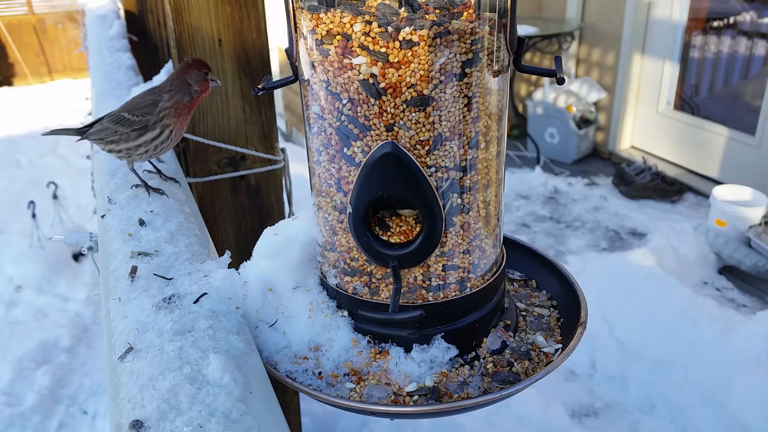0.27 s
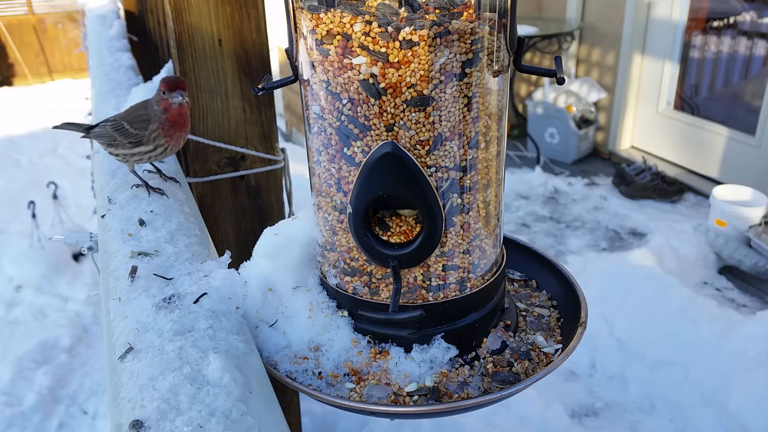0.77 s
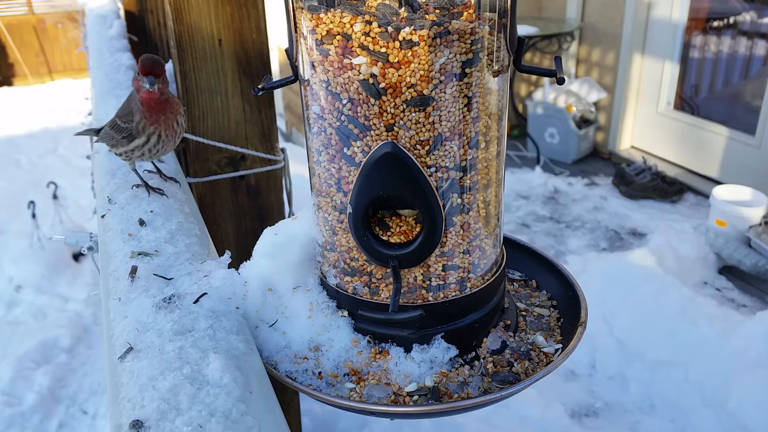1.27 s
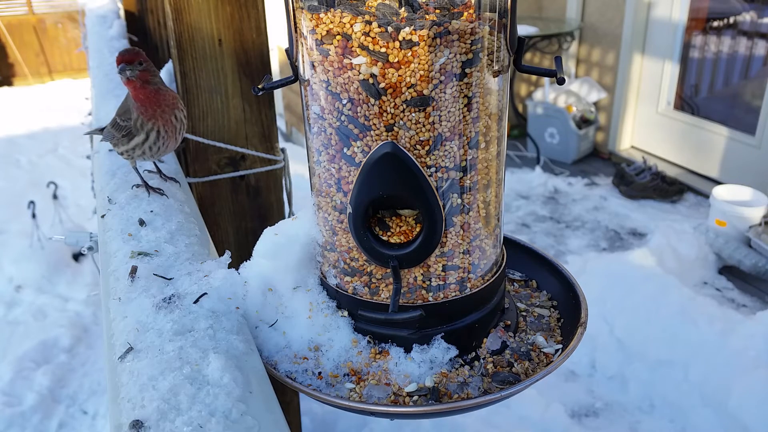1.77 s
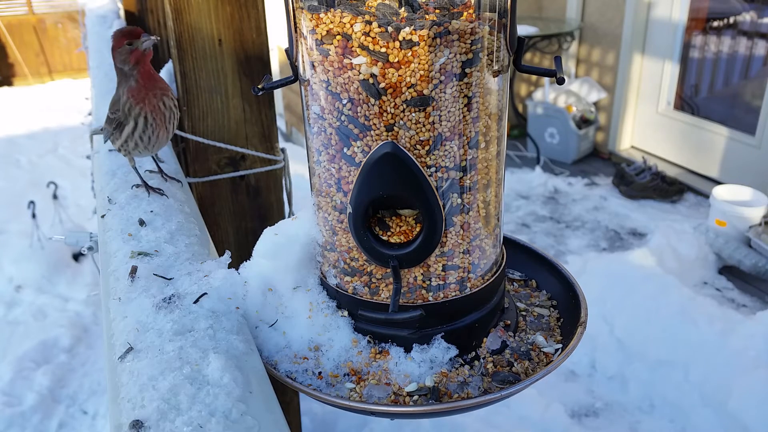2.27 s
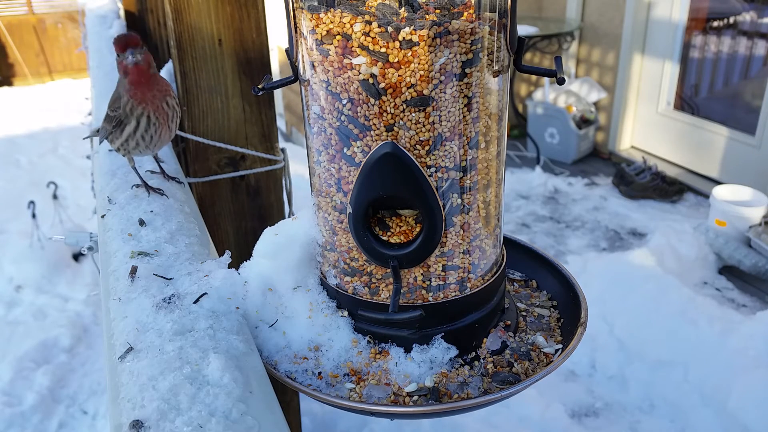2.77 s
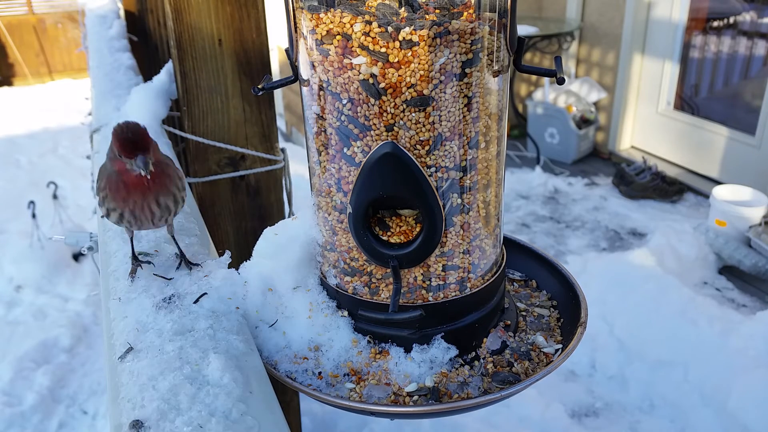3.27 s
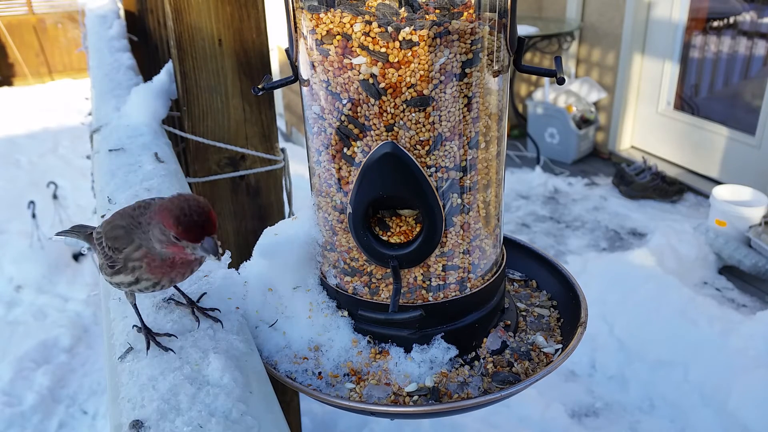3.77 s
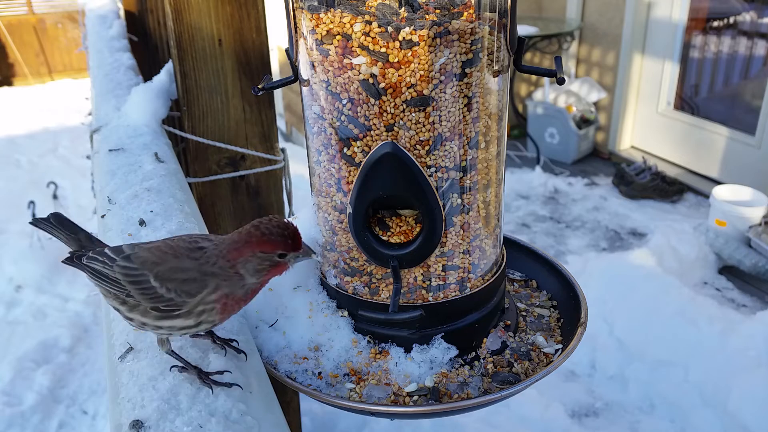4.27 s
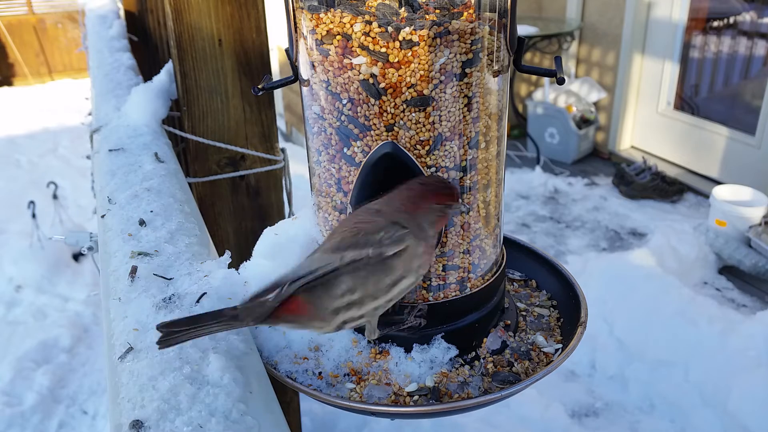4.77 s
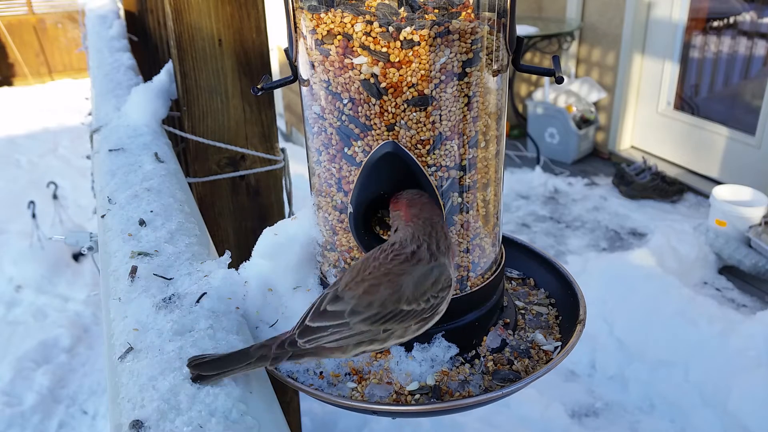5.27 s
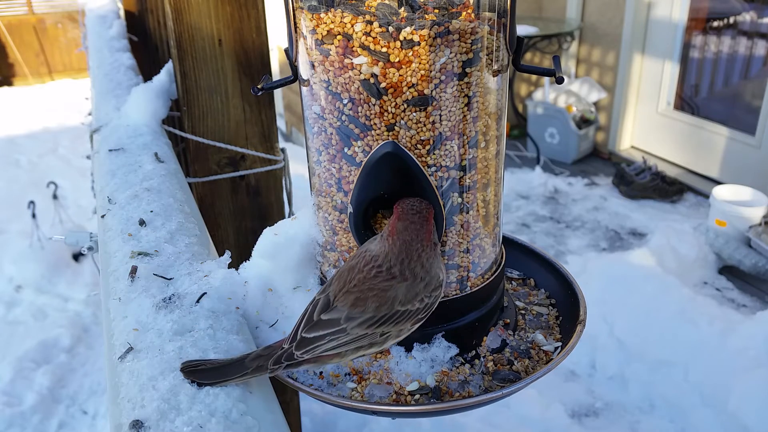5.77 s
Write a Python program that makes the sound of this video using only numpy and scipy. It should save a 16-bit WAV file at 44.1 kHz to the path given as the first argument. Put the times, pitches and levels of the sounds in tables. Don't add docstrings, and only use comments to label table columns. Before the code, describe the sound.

Deep steady aircraft hum outdoors, soft road wash, tiny claw ticks, one brief bright bird chirp midway, then faint pecking at a feeder.

```python
import sys
import numpy as np
from scipy import signal
from scipy.io import wavfile
from scipy.ndimage import uniform_filter1d

SR = 44100
rng = np.random.default_rng(int(sys.argv[2]) if len(sys.argv) > 2 else 0)


def persist_wave(psi):
    counts = np.round(np.clip(psi, -1, 1) * 32767).astype(np.int16)
    wavfile.write(sys.argv[1], SR, np.atleast_2d(counts).T)


def undo_db(level):
    steps = np.asarray(level, float) / 20
    return 10 ** steps


N = 265129

# time_s, level_db
BLADE_LEVEL = [(0.0, -23), (0.03, -24), (0.23, -20), (0.5, -21.5), (0.75, -17.5), (0.92, -20.5),
               (1.52, -18.5), (1.69, -27.5), (2.02, -20), (3.06, -22), (3.23, -19), (3.45, -22.5),
               (4.33, -17), (4.4, -18.5), (5.22, -14.5), (5.31, -13), (5.93, -13), (6.01, -12.5)]
# multiple, start_level_db, change_db_per_s
BLADE_OVERTONES = [(2, -36, -.5), (3, -53.5, -0.1), (4, -45.5, -2.5)]
# time_s, multiple, gain_db, half_length_s
EDDIES = [(0.3, 2, 3.5, 0.22), (0.527, 4, 7.5, 0.43), (2.206, 2, 10, 0.28), (3.55, 2, -3, 0.34),
          (1.0, 2, 3, 0.13), (2.08, 3, 13.5, .25), (1.85, 4, 9.5, 0.58), (3.9, 3, 9, 0.48),
          (5.37, 2, 6, .25), (5.0, 4, 5, 0.36), (5.95, 2, -12, 0.34), (1.64, 2, -4, 0.26)]
# time_s, blade_left_over_right_db, blade_left_lead_rad, wash_left_over_right_db
DIRECTION = [(0, 1.07, 0.403, 1.3), (1.75, 0.5, 0.34, 1.5), (3, 0.55, .28, 1.5), (4.2, -0.11, 0.26, 2.5),
             (6.01, 0.5, 0.18, 1.47)]

# first_hz, last_hz, settling_s, loudest_s, level_db, fall_db_per_s
GEAR_WHINES = [
    (3400, 2760, 1, 3.6, -67, 3.5),
    (2200, 2240, 1.6, 4.45, -65, 22),
]
# start_s, centre_hz, width_hz, peak_db, length_s
ROUGH_PATCHES = [(3.04, 970, 89.5, -48, .3), (3.488, 898, 70, -41, 0.12), (3.62, 945, 60, -39, .16),
                 (4.1, 930, 90, -43.5, .2), (2.12, 1500, 496.6, -44, 0.13), (4.18, 1750, 501, -47, .1),
                 (1.3, 255, 64, -34.5, .4), (.8, 620, 250, -48.5, .3), (4.6, 510, 120, -43, 0.31),
                 (2.0, 560, 210, -46.5, .35), (4.15, 300, 80, -41, .45), (1.2, 400, 130, -42, .4),
                 (1.7, 400, 110, -44, .3), (5.2, 270, 53, -39, .2), (5.8, 400, 150, -45, .2),
                 (4.22, 4100, 1500, -60.5, .15)]

# time_s, pitch_hz, level_db, overtone_db
GLIDING_VOICE = [(2.879, 4038, -58.5, -15.5), (2.896, 3680, -42.5, -21), (2.911, 3352, -29.5, -17.5),
                 (2.919, 3013, -23, -18.5), (2.93, 2765, -34.5, -1), (2.943, 2730, -40, 2.5),
                 (2.953, 2733, -31.5, -7.5), (2.968, 2768, -46.5, -14.5), (2.997, 2690, -50, -35)]
# time_s, pitch_hz, level_db, overtone_db
STEADY_VOICE = [(2.886, 3080, -65, -15), (2.895, 3220, -42.5, -16.5), (2.906, 3110, -26.5, -30),
                (2.916, 3038, -31.5, -31.5), (2.925, 3140, -46.5, -20.5), (2.94, 3002, -32, -27.5),
                (2.948, 2920, -58, -24)]
# multiple, level_db
VOICE_OVERTONES = [(2, 1), (3, -7), (4, -12.5), (5, -26)]
# delay_s, level_db
NEAR_ECHOES = [(.004, -8.5), (.011, -4), (.019, -12.5), (.027, -20), (.038, -21)]
# start_s, peak_db, brightness_0_to_2, length_s
CLAW_TICKS = [(0.554, -34.5, 0.86, 0.0017), (0.557, -35, 1.7, 0.0018), (0.561, -39.5, 0.26, .004),
              (1.485, -50.5, 2, .002), (1.55, -53, 1.3, .0026), (2.007, -55, 1.5, 0.0038),
              (2.236, -37.5, 1.2, .0015), (3.08, -50.5, 1.6, .0018), (3.085, -51.5, 2.3, .001),
              (3.111, -53.5, 2.3, .001), (3.1435, -40, .45, 0.0021), (3.149, -52.5, 1.8, .002),
              (3.171, -56, 2.3, 0.0046), (3.32, -49, 1.2, 0.006), (3.326, -47, 1.5, .007),
              (3.466, -50.5, 1.55, .006), (3.476, -52.5, 2.3, .005), (3.504, -48, .7, .002),
              (3.507, -52.5, 1.9, 0.0044), (3.616, -52, 2, .005)]
# start_s, peak_db, brightness_0_to_2, length_s
PECK_TICKS = [(4.268, -52.5, 1.1, .0056), (4.283, -49.5, 1.47, 0.0061), (4.311, -49.5, 1.5, 0.0041),
              (4.55, -54.5, 1.3, 0.0034), (4.819, -37, 0.13, 0.0024), (5.358, -55, 1.7, 0.015),
              (5.449, -49.5, 2.3, .0011), (5.491, -50, .6, 0.0018), (5.498, -50.5, 2.6, .0012),
              (5.529, -57.5, 2, 0.003), (5.5485, -44.5, 1.45, .002), (5.554, -43, 2.4, 0.0012),
              (5.598, -47, 1.2, .0022), (5.648, -39.5, 0.58, .0017), (5.653, -49.5, 2, .002),
              (5.706, -56, 1.5, .0037)]
# centre_hz, width_hz, boost_db
HOLLOWS = [(2600, 230, 13), (4200, 320, 4.5), (5240, 170, 6)]
# start_s, peak_db, left_over_right_db
RAIL_HOPS = [
    (3.081, -45, 5.0),
    (3.144, -43.5, 0.5),
    (3.3288, -48, 3),
    (3.4664, -41.5, 4),
    (3.5015, -40.5, 7.5),
    (3.6137, -47, 6),
    (4.271, -45.5, 4.5),
]
# pitch_hz, level_db, time_to_fall_60_db_s
RAIL_TONES = [(4220, 0, 0.018), (4263, -10.5, 0.16), (4362, -18, .08)]
# start_s, length_s, first_hz, last_hz, level_db
FAR_NOTES = [
    (5.616, 0.036, 4700, 4500, -63.5),
    (5.63, .022, 4050, 3880, -61),
    (5.854, .046, 3400, 2800, -61),
    (5.886, .018, 3350, 3860, -58),
    (5.909, .03, 3894, 4050, -64.5),
    (5.292, .035, 2730, 2998, -66),
]

# level_db, share_of_car_nearness, change_db_per_s, gusting_db
WASH_LAYERS = [
    (-39, -0.32, -0.26, 0.6),
    (-44.5, 0.05, -0.29, 1.6),
    (-47.5, 1.015, 0.17, 1.45),
    (-51.5, 1.04, 0.11, .5),
]
# frequency_hz, level_db_per_hz
RUMBLE_SPECTRUM = [(20, -17.5), (50, -6), (75, -3.5), (140, -3), (200, 6), (260, -4.5), (330, 2.5),
                   (420, -20.5), (600, -32)]
# frequency_hz, level_db_per_hz
ROAR_SPECTRUM = [(250, -17), (400, 1.5), (480, 2.5), (570, -3.5), (660, 2), (740, -11.5), (1100, -33.5)]
# frequency_hz, level_db_per_hz
RUSH_SPECTRUM = [(550, -20.5), (740, -4), (820, 2), (890, -2), (970, 0), (1080, -4.5), (1400, -9.5),
                 (1900, -29)]
# frequency_hz, level_db_per_hz
HISS_SPECTRUM = [(900, -26), (1500, -1.5), (2000, -5), (3000, -10.5), (4300, -14.5), (6000, -25.5),
                 (9000, -37.5)]
# frequency_hz, level_db_per_hz
STILL_AIR = [(1180, -34), (2000, -17.5), (3610, -12), (4040, -11), (4360, -10.5), (5500, -8.5),
             (6090, -9.5), (14200, -18), (15500, -25)]
# frequency_hz, likeness
LIKENESS = [(30, 0.97), (100, 0.67), (200, 0.98), (450, 0.97), (1000, 0.61), (2200, 0.34), (4000, -0.064),
            (7000, -0.16), (15000, -0.2)]
# frequency_hz, left_over_right_db
SIDE_LEVEL = [(40, 0.8), (200, -.5), (450, -0.4), (1000, 0.5), (2300, -0.3), (6000, -1.5), (15000, -1.5)]
# frequency_hz, left_lead_rad
SIDE_PHASE = [(40, -0.36), (200, -0.25), (450, -0.54), (1000, -0.13), (2500, -0.15), (5000, -0.066)]


def propeller():
    t = np.arange(N) / SR
    hz = 109.37 - 2.95 * t + 0.065 * t ** 2
    level_db, = columns(BLADE_LEVEL, t)
    lean_db, lead, _ = columns(DIRECTION, t)
    turn = 2 * np.pi * np.cumsum(hz) / SR - 1.37
    out = tone_pair(turn + 0.11 * wander(25), level_db + 0.41 * wander(25), lean_db, lead)
    for k, db, slope_db in BLADE_OVERTONES:
        over_db = db + slope_db * t
        for s, multiple, gain_db, half_s in EDDIES:
            if multiple == k:
                over_db = over_db + gain_db * np.exp(-((t - s) / half_s) ** 2)
        over_turn = k * turn + 0.2 * k * wander(18)
        over_db = over_db + 0.7 * k * wander(16)
        out = out + tone_pair(over_turn, over_db, read(SIDE_LEVEL, k * hz), read(SIDE_PHASE, k * hz))
    return out


def engine():
    t = np.arange(N) / SR
    cruise_hz, idle_hz, brake_s = 42.2, 28.3, 2.75
    hz = np.maximum(cruise_hz - 0.8 * t - 5.3 * np.maximum(t - brake_s, 0), idle_hz)
    load_db = -6 * ((cruise_hz - hz) / (cruise_hz - idle_hz)) ** 2
    throb_s, throb_top_s = 0.92, 3.15
    throb_db = 7.5 * np.cos(2 * np.pi * (t - throb_top_s) / throb_s) * undo_db(nearness(t))
    turn = 2 * np.pi * np.cumsum(uniform_filter1d(hz, size=8820)) / SR
    first_db = -43 + load_db + 1.6 * wander(7.3)
    second_db = -39.5 + 1.7 * nearness(t) + load_db + throb_db + 1.3 * wander(8)
    out = tone_pair(turn, first_db, -1.1, -0.5)
    out = out + tone_pair(2 * turn + 2.6 * wander(8), second_db, -0.7, -0.38)
    for first_hz, last_hz, settle_s, top_s, db, fall_db in GEAR_WHINES:
        gear_hz = last_hz + (first_hz - last_hz) * np.exp(-np.maximum(t - 3, 0) / settle_s)
        level_db = db - np.where(t < top_s, 17, fall_db) * abs(t - top_s)
        gear_turn = 2 * np.pi * np.cumsum(gear_hz) / SR + 2.6 * wander(40)
        out = out + tone_pair(gear_turn, level_db + 4.3 * wander(17), 2.5, 0.3)
    return out


def tyres():
    out = np.zeros((2, N))
    for s, hz, width_hz, peak_db, length in ROUGH_PATCHES:
        a, b = rng.standard_normal((2, SR // 2))
        tread = signal.iirpeak(hz, 0.65 * hz / width_hz, fs=SR)
        noise = np.array([a + 0.4 * b, a - 0.45 * b])
        held = signal.lfilter(*tread, signal.lfilter(*tread, noise))
        span = round(length * SR)
        swell = evened(held)[:, -span:] * np.hanning(span)
        add(out, s, undo_db(peak_db) * swell * undo_db([[1.2], [-1.2]]))
    return out


def nearness(t):
    nearest_s, width_s = 3.145, 1.085
    return -10 * np.log10(1 + ((t - nearest_s) / width_s) ** 2)


def birds():
    direct = np.zeros((2, N))
    add(direct, GLIDING_VOICE[0][0], whistle(GLIDING_VOICE, 1.0))
    add(direct, STEADY_VOICE[0][0], whistle(STEADY_VOICE, 0.6))
    for note in FAR_NOTES:
        add(direct, note[0], far_note(*note))
    out = direct.copy()
    dull = signal.sosfilt(signal.butter(4, 4200, fs=SR, output="sos"), direct)
    for k, (s, db) in enumerate(NEAR_ECHOES):
        right = 0.61 * (-1) ** (k + 1)
        add(out, s, undo_db(db) * dull * [[1], [right]])
    for rows, lean_db in ((CLAW_TICKS, 2.7), (PECK_TICKS, 1)):
        for s, *row in rows:
            add(out, s, tick(*row, lean_db))
    for s, *row in RAIL_HOPS:
        add(out, s, hop(*row))
    return out


def whistle(rows, lean_db):
    t = np.arange(rows[0][0], rows[-1][0], 1 / SR)
    hz, level_db, over_db = (uniform_filter1d(c, size=120) for c in columns(rows, t))
    rasp = evened(uniform_filter1d(rng.standard_normal((len(t), 3)), size=50, axis=0)).T
    slide_hz_per_s = abs(np.gradient(hz) * SR)
    shaken_hz = hz * (1 + (0.0045 + 0.0000007 * slide_hz_per_s) * rasp[0])
    turn = 2 * np.pi * (np.cumsum(shaken_hz) / SR + rng.random())
    overtones = 0
    for k, db in VOICE_OVERTONES:
        beak_db = np.interp(k * hz, [9500, 14500], [0, -6])
        overtones = overtones + undo_db(db + beak_db + 1.2 * rasp[2]) * np.sin(k * turn)
    breath_band = signal.butter(2, (3300, 4800), "bandpass", fs=SR, output="sos")
    breath = signal.sosfilt(breath_band, rng.standard_normal((2, len(t))))
    beam = panned(undo_db(over_db) * overtones, lean_db + 3)
    beam[1] = np.roll(beam[1], shift=1)
    voice = panned(undo_db(0.69 * rasp[1]) * np.sin(turn), lean_db) + beam + undo_db(-15.5) * breath
    return np.sqrt(2) * undo_db(level_db) * voice * signal.windows.tukey(len(t), 0.1)


def tick(peak_db, bright, length, lean_db):
    t = np.arange(2000) / SR
    distance = (np.arange(3) - bright) ** 2
    nearest = (np.clip(round(bright), 0, 2) - bright) ** 2
    bands_db = peak_db - 13 * (distance - nearest)
    after = np.maximum(t - length, 0)
    a, b = rng.standard_normal((2, len(t))) * undo_db(-60 * after / 0.016) * np.minimum(t / 0.00066, 1)
    a = a + 3.1 * signal.unit_impulse(len(t), idx=8)
    scratch = np.array([a + 0.3 * b, a - 0.1 * b])
    for hz, width_hz, db in HOLLOWS:
        ringing = signal.lfilter(*signal.iirpeak(hz, hz / width_hz, fs=SR), scratch)
        scratch = scratch + (undo_db(db) - 1) * ringing
    sound = 0
    for edges_hz, db in zip(((1400, 3700), (3700, 6300), (6300, 14500)), bands_db):
        band = signal.sosfilt(signal.butter(4, edges_hz, "bandpass", fs=SR, output="sos"), scratch)
        sound = sound + undo_db(db) * band / abs(band).max()
    return sound * undo_db([[lean_db / 2], [-lean_db / 2]])


def hop(peak_db, lean_db):
    t = np.arange(4000) / SR
    ring = 0
    for hz, db, t60 in RAIL_TONES:
        ring = ring + undo_db(peak_db + db - 1.5 - 60 * t / t60) * np.sin(2 * np.pi * hz * t)
    return panned(ring, lean_db)


def far_note(s, length, first_hz, last_hz, level_db):
    shares = np.array([0, 0.22, 0.78, 1])
    pitch_hz = first_hz + (last_hz - first_hz) * shares
    swell_db = level_db - 16.5 * np.array([1, 0, 0, 1])
    rows = np.c_[s + length * shares, pitch_hz, swell_db, np.full(4, -27)]
    return whistle(rows, 1.5)


def wash():
    frames, hz = N // 256 + 5, np.fft.rfftfreq(1024, 1 / SR)
    t = np.arange(frames) * 256 / SR
    a, b, c, d, patches = rng.standard_normal((frames, 513, 5)).T
    patches = uniform_filter1d(uniform_filter1d(patches, size=8, axis=0), size=16, axis=1)
    patches = evened(patches)
    still = undo_db(2 * read(STILL_AIR, hz))
    power = undo_db(2 * -61.5) * still[:, None] / np.sum(still[hz > 3000])
    shapes = (RUMBLE_SPECTRUM, ROAR_SPECTRUM, RUSH_SPECTRUM, HISS_SPECTRUM)
    for shape, (db, share, fade_db, gust_db) in zip(shapes, WASH_LAYERS):
        gusts = np.resize(wander(12)[::256], frames)
        level_db = db + share * nearness(t) + fade_db * t + gust_db * gusts
        per_bin = undo_db(2 * read([(5, -63.5)] + shape + [(SR / 2, -90)], hz))
        power = power + np.outer(per_bin / per_bin.sum(), undo_db(2 * level_db + 7.0))
    same, left = read(LIKENESS, hz)[:, None], a + 1j * b
    z = np.array([left, same * left + np.sqrt(1 - same ** 2) * (c + 1j * d)])
    z[1] *= np.exp(-1j * read(SIDE_PHASE, hz))[:, None]
    lean_db = read(SIDE_LEVEL, hz)[:, None] + columns(DIRECTION, t)[2]
    unit = np.sqrt(np.mean(signal.istft(left, nperseg=1024, noverlap=768)[1] ** 2) / 513)
    z = z * np.sqrt(power) * undo_db(0.84 * patches) / unit
    z = z * np.array([undo_db(lean_db / 2), undo_db(-lean_db / 2)])
    return signal.istft(z, nperseg=1024, noverlap=768)[1][:, :N]


def tone_pair(turn, level_db, lean_db, lead):
    left = undo_db(lean_db / 2) * np.sin(turn + lead / 2)
    right = undo_db(-lean_db / 2) * np.sin(turn - lead / 2)
    return np.sqrt(2) * undo_db(level_db) * np.array([left, right])


def panned(x, lean_db):
    return np.array([x * undo_db(lean_db / 2), x * undo_db(-lean_db / 2)])


def wander(rate_hz):
    t = np.arange(0, N + 256, 256) / SR
    slow = 0
    for f in np.geomspace(0.1 * rate_hz, rate_hz, num=24):
        slow = slow + np.sin(2 * np.pi * (f * t + rng.random())) / np.sqrt(f)
    return np.interp(np.arange(N) / SR, t, evened(slow))


def evened(x):
    return x / np.sqrt(np.mean(x ** 2) + 1e-20)


def read(points, hz):
    f, value = np.transpose(points)
    return np.interp(np.log(hz + 1), np.log(f + 1), value)


def columns(rows, t):
    s, *rest = np.transpose(rows)
    return [np.interp(t, s, c) for c in rest]


def add(mix, s, sound):
    part = mix[:, round(s * SR):][:, :sound.shape[1]]
    part += sound[:, :part.shape[1]]


def scene():
    return propeller() + engine() + tyres() + birds() + wash()


def band_limit(x):
    return signal.sosfilt(signal.butter(12, 15760, fs=SR, output="sos"), x)


def record(dry):
    return band_limit(dry)


dry = scene()
out = record(dry)
persist_wave(out)
```